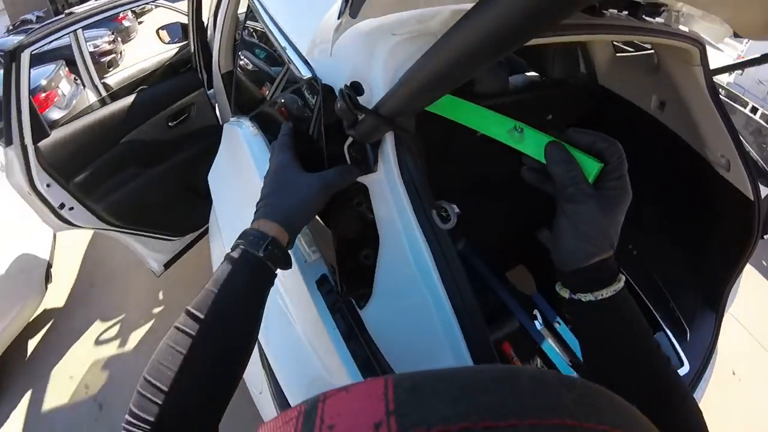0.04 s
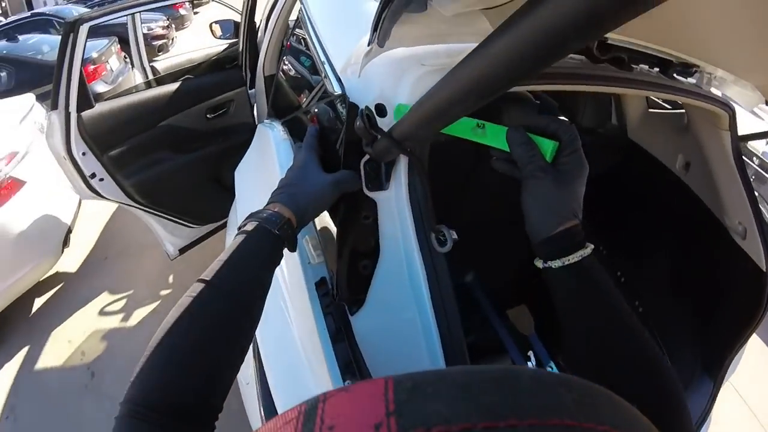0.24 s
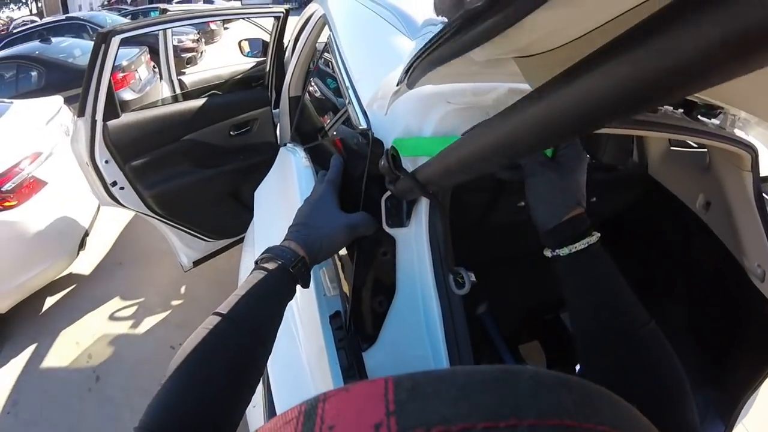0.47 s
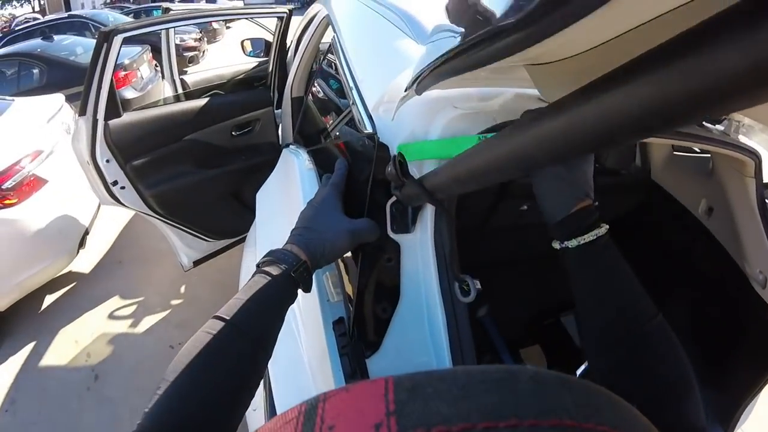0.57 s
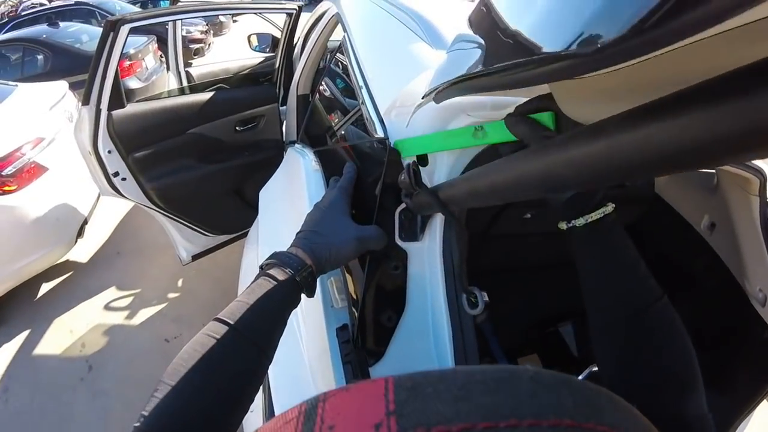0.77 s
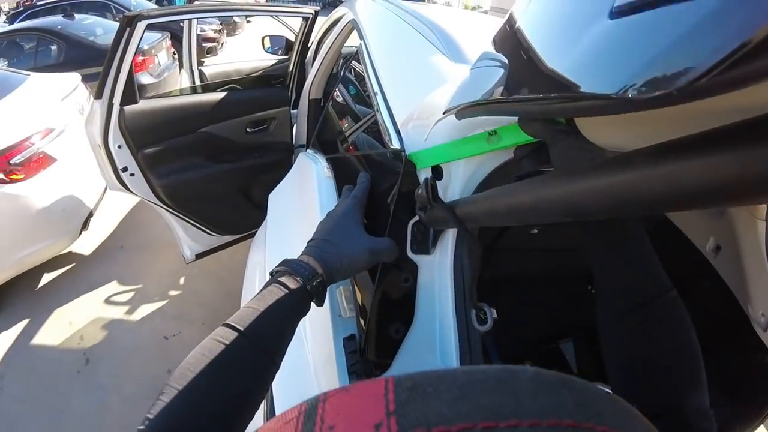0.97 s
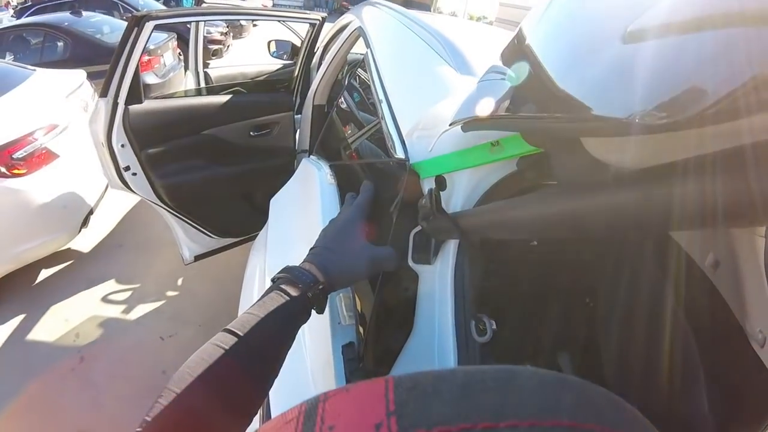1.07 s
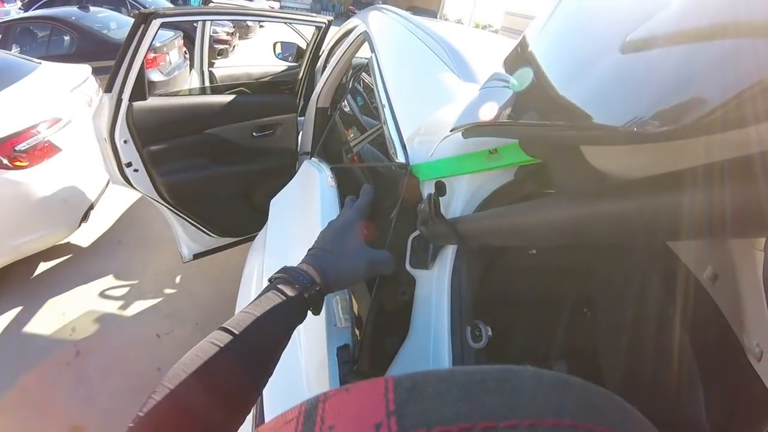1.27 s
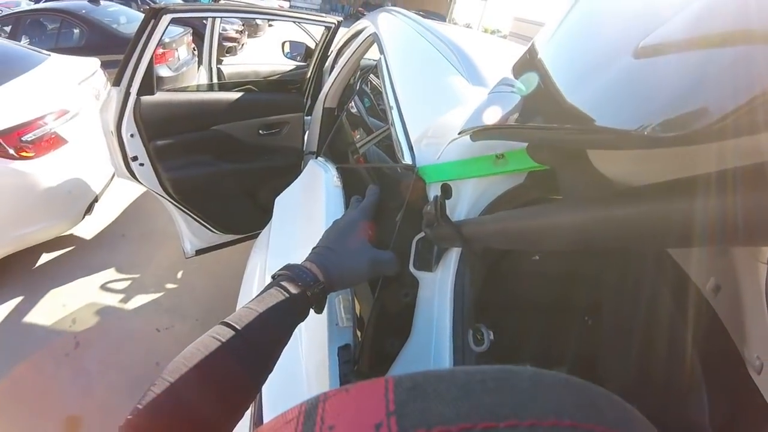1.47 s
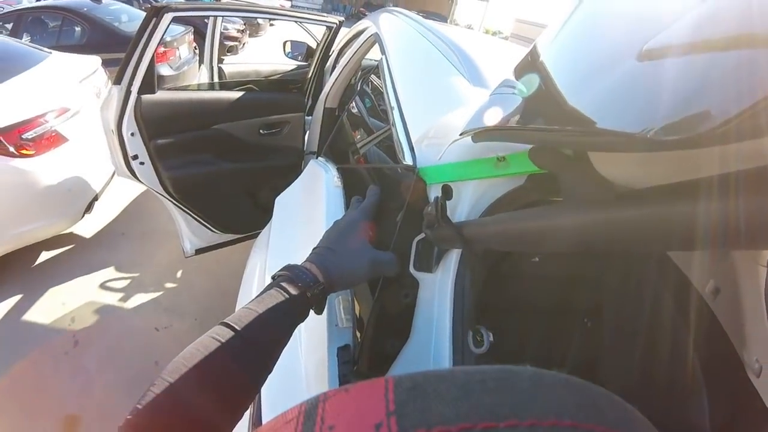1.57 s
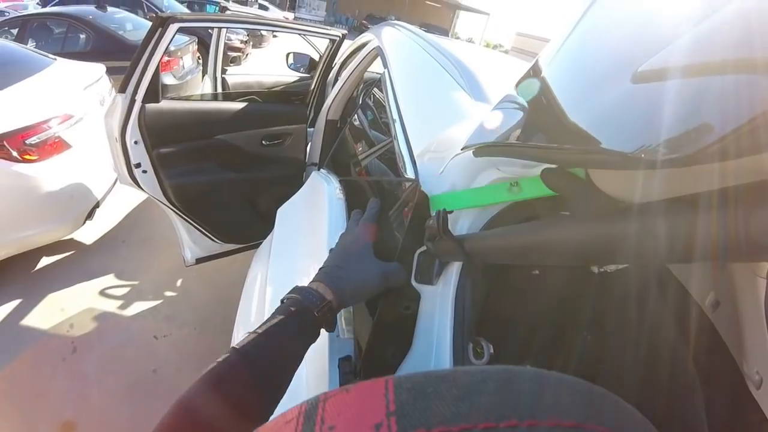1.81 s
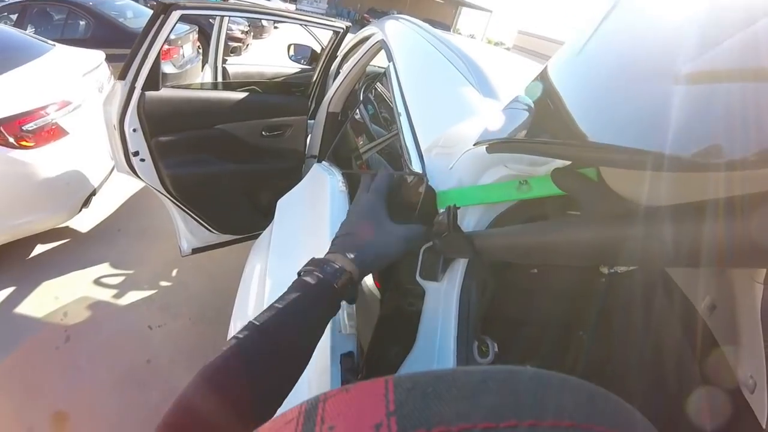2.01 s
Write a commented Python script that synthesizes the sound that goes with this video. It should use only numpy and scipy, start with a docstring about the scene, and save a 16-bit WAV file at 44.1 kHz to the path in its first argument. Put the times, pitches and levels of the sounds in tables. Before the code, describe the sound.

A sharp plastic snap at about 0.97 seconds as a trim clip lets go of a car pillar, with a brief twang and rattle. Before it, a short gritty slide at 0.35-0.55, a light tick near 0.63, then hollow flexing and creaks from 0.87. Light ticks and knocks follow from 1.4 to 2.0. Wind thumps and flutters on the close microphone, strongest near 0.7 and 0.9, over steady outdoor rush, faint hum and a thin distant whine.

```python
"""Outdoors, beside a car pillar: a plastic pry tool works under the trim while wind buffets the microphone.
Something slides briefly along the trim: tiny slips ring resonances, with a friction hiss. The panel flexes
in hollow shudders and creaks, then a clip lets go with a sharp snap: a crack, ringing modes, a twang and a
rattle. Light ticks of coloured noise and ringing come before and after the snap. Behind it lie a steady
rush and faint hum of filtered noise, and a thin, distant, wavering whine."""
import sys
import numpy as np
from scipy import signal
from scipy.fft import rfft, irfft
from scipy.io import wavfile
from scipy.ndimage import uniform_filter1d

SR = 44100
rng = np.random.default_rng(int(sys.argv[2]) if len(sys.argv) > 2 else 0)


def file_out(sig):
    """Save sig as 16-bit WAV at sys.argv[1]."""
    # one column per channel
    cols = np.atleast_2d(sig).T
    # limit, then scale
    lim = np.clip(cols, -1, 1)
    pcm = np.round(lim * 32767).astype(np.int16)
    wavfile.write(sys.argv[1], SR, pcm)


N = 90404  # length in samples
TIME = np.arange(N) / SR  # seconds


def from_db(db):
    """Turn decibels into a gain."""
    return 10 ** (np.asarray(db) / 20)


def rms_one(x):
    """Scale a signal to an average power of one."""
    return x / np.sqrt(np.mean(x ** 2) + 1e-20)


def in_time(rows):
    """Join the rows of a table by straight lines, giving one signal per column after the time."""
    s, *columns = np.transpose(rows)
    return [np.interp(TIME, s, c) for c in columns]


def noise(spectrum):
    """Make noise of unit power, coloured by a table of pitches and levels."""
    hz, db = np.transpose(spectrum)
    bin_hz = np.maximum(np.arange(N // 2 + 1) * SR / N, 1)
    # levels are joined along a logarithmic pitch scale
    bin_db = np.interp(np.log(bin_hz), np.log(hz), db, left=-90, right=-120)
    white = rfft(rng.standard_normal(N))
    return rms_one(irfft(white * from_db(bin_db), N))


def steadied(x, size):
    """Even out the chance swells of a noise over a window of `size` samples."""
    return x / np.sqrt(uniform_filter1d(x ** 2, size) + 1e-9)


def soften(x, hz, order=2):
    """Take away the treble above a cut-off pitch."""
    low_pass = signal.butter(order, min(hz, .45 * SR), fs=SR, output="sos")
    return signal.sosfilt(low_pass, x + 1e-18)


def resonate(x, hz, width):
    """Pass a signal through one resonance with gain 1 at its top; a narrower width rings longer."""
    r = np.exp(-np.pi * width / SR)
    top = np.array([1, 0, -1]) * (1 - r * r) / 2
    return signal.lfilter(top, [1, -2 * r * np.cos(2 * np.pi * hz / SR), r * r], x)


def ring(force, modes):
    """Let a force set off a table of modes, each a sine that dies away by 60 dB in its ring time."""
    out = np.zeros(N)
    for k, (hz, db, ring_s) in enumerate(modes):
        r = np.exp(-np.log(1000) / (ring_s * SR))
        w = 2 * np.pi * hz / SR
        mode = signal.lfilter([0, np.sin(w)], [1, -2 * r * np.cos(w), r * r], force + 1e-18)
        out += (-1) ** k * from_db(db) * mode  # neighbours have opposite signs
    return out


def click(s, db):
    """Make a single one-sample impulse."""
    return from_db(db) * (np.arange(N) == int(s * SR))


def slips(per_s, spread_db):
    """Friction sticks and slips: impulses of random time, sign and size."""
    happens = rng.random(N) < per_s / SR
    sign = rng.choice([-1, 1], N)
    size = from_db(spread_db * np.minimum(rng.exponential(1, N), 4))
    return happens * sign * size


def dying(s, decay_s, attack_s=0.0013):
    """Make an envelope that rises quickly and dies away."""
    age = np.maximum(TIME - s, 0)
    return (1 - np.exp(-(age / attack_s) ** 2)) * np.exp(-age / decay_s)


def swells(rows):
    """Add up bell-shaped efforts."""
    return sum(from_db(db) * np.exp(-((TIME - s) / half) ** 2 / 2) for s, db, half in rows)


# colour of the outdoor rush: pitch_hz, relative_level_db (per Hz)
RUSH_COLOUR = [(100, 1.5), (250, 4.5), (450, -2.5), (750, -1), (1050, 1), (1380, -0.5), (1700, -11),
               (2300, -18), (3500, -16.5), (4600, -24.5), (8300, -30), (10000, -38.5), (12500, -41),
               (14000, -78)]
# loudness of the rush before its overall gain: time_s, level_db
RUSH_LEVEL = [(0.02, -46.5), (0.79, -47), (1.64, -46), (2.05, -45)]
RUSH_GAIN_DB = 2.5


def rush():
    """A broad, steady outdoor rush is noise with a fixed colour."""
    level_db, = in_time(RUSH_LEVEL)
    return from_db(level_db + RUSH_GAIN_DB) * noise(RUSH_COLOUR)


HUM_HZ, HUM_WIDTH_HZ, HUM_DB = 356.6, 7.7, -56.5


def hum():
    """A faint hum is noise squeezed through one narrow resonance."""
    return from_db(HUM_DB) * rms_one(resonate(rng.standard_normal(N), HUM_HZ, HUM_WIDTH_HZ))


# loudness of the distant whine, which grows overall: time_s, level_db
WHINE_LEVEL = [(0, -70.5), (.45, -73), (.75, -65), (1.2, -61.5), (1.55, -62.5), (1.85, -57), (2.05, -60.5)]
WHINE_HZ, WHINE_WAVER_HZ = 2127, 1.75


def whine():
    """A thin whine is a sine whose pitch drifts slightly and slowly."""
    pitch = WHINE_HZ + WHINE_WAVER_HZ * rms_one(soften(rng.standard_normal(N), hz=6.0))
    tone = rms_one(np.sin(2 * np.pi * np.cumsum(pitch) / SR))
    level_db, = in_time(WHINE_LEVEL)
    return from_db(level_db) * tone


# loudness of the wind's rumble before its overall gain: time_s, level_db
RUMBLE_LEVEL = [(0.02, -23.5), (0.11, -42), (0.18, -22.5), (0.22, -24), (0.39, -30), (0.58, -27),
                (0.69, -16), (0.77, -26.5), (0.83, -21.5), (0.895, -15), (0.95, -28.5), (1.01, -21.5),
                (1.07, -32), (1.16, -21), (1.31, -29), (1.375, -21.5), (1.45, -34), (1.62, -29),
                (1.70, -31.5), (1.76, -28), (1.86, -32), (2.05, -31.5)]
# colour of the rumble: pitch_hz, relative_level_db (per Hz)
RUMBLE_COLOUR = [(15, -0.5), (28, 2), (45, -8), (65, -8.5), (95, -22), (140, -26), (300, -52)]
# loudness of the wind's flutter before its overall gain: time_s, level_db
FLUTTER_LEVEL = [(0.02, -49.5), (0.19, -46), (0.33, -49.5), (0.52, -34), (0.59, -37), (0.665, -26),
                 (0.74, -42), (0.82, -41), (0.885, -33), (0.96, -40), (1.08, -46), (1.16, -42), (1.27, -77),
                 (1.41, -34.5), (1.54, -59), (1.65, -43), (1.71, -45), (1.9, -44), (1.97, -39.5),
                 (2.05, -61)]
# colour of the flutter: pitch_hz, relative_level_db (per Hz)
FLUTTER_COLOUR = [(60, -14), (110, 5), (160, -4), (240, -13), (400, -26.5), (900, -30.5)]
# a single buffet of air: time_s, peak_db, width_s
BUFFETS = [(0.889, -7.5, .0072)]
RUMBLE_GAIN_DB, FLUTTER_GAIN_DB = 1, -2


def wind():
    """Eddies rumble and flutter on the microphone; the strongest arrives as a single pressure swing."""
    rumble_db, = in_time(RUMBLE_LEVEL)
    flutter_db, = in_time(FLUTTER_LEVEL)
    out = from_db(rumble_db + RUMBLE_GAIN_DB) * steadied(noise(RUMBLE_COLOUR), size=2500)
    out += from_db(flutter_db + FLUTTER_GAIN_DB) * steadied(noise(FLUTTER_COLOUR), size=1800)
    for s, db, width in BUFFETS:
        u = (TIME - s) / width
        out += from_db(db) * (1 - u * u) * np.exp(-u * u / 2)  # a push with a dip on each side
    return out


# rise and fall of the sliding contact, before the gains below: time_s, relative_level_db
SLIDE_LEVEL = [(0.338, -68), (0.36, -47), (0.39, -41.5), (0.422, -36.5), (0.475, -42.5), (0.515, -51),
               (0.56, -76)]
# resonances under the slide: pitch_hz, width_hz, relative_level_db, swell_delay_s (negative is earlier)
SLIDE_BODY = [(2660, 200, -5.5, 0.001), (3050, 280, -9.5, 0), (3580, 240, -8, -0.010),
              (6200, 600, -20, -0.017)]
# colour of the friction hiss: pitch_hz, relative_level_db
HISS_COLOUR = [(400, -1), (650, 1), (900, 2), (1400, -2), (1800, -5), (3000, -10), (4500, -23.5),
               (8000, -32), (13000, -43)]
# loudness of the trim's main ring under the slide: time_s, level_db
SLIDE_RING_LEVEL = [(0.29, -76), (0.33, -44.5), (0.36, -41), (0.405, -39.5), (0.42, -62), (0.436, -38.5),
                    (0.47, -36.5), (0.53, -61)]
SLIDE_RING_HZ, SLIDE_RING_WIDTH_HZ = 1202, 85
SLIPS_PER_S, BODY_GAIN_DB = 1100, 15.5
HISS_GAIN_DB, HISS_DELAY_S = -2, 0.016
GRIT_RATE_HZ, GRIT_SWING_DB = 160, 1.8  # quick random unevenness of the rub


def slide():
    """Dense tiny slips excite the trim; the rub starts bright and turns broader and duller toward its end."""
    level_db, = in_time(SLIDE_LEVEL)
    uneven_db = GRIT_SWING_DB * rms_one(soften(rng.standard_normal(N), GRIT_RATE_HZ))
    force = slips(SLIPS_PER_S, spread_db=-4)

    def swell(delay_s):
        """The rise and fall of the rub, shifted in time."""
        return from_db(np.interp(TIME - delay_s, TIME, level_db) + uneven_db)

    body = np.zeros(N)
    for k, (hz, width, db, delay_s) in enumerate(SLIDE_BODY):
        body += (-1) ** k * from_db(db) * swell(delay_s) * resonate(force, hz, width)
    body *= from_db(BODY_GAIN_DB) / np.std(force)

    ring_db, = in_time(SLIDE_RING_LEVEL)
    ringing = rms_one(resonate(force, SLIDE_RING_HZ, SLIDE_RING_WIDTH_HZ))
    main_ring = from_db(ring_db) * steadied(ringing, size=1500)
    hiss = from_db(HISS_GAIN_DB) * swell(HISS_DELAY_S) * noise(HISS_COLOUR)
    return soften(main_ring, hz=2500) + soften(body, hz=6450) + hiss


# hollow modes of the whole panel: pitch_hz, relative_level_db, ring_time_s
PANEL = [(245, -1, 0.05), (285, 2, 0.045), (358, -2, 0.04), (510, -11, 0.04), (700, -16, 0.04),
         (993, -17, 0.05), (1170, -16, 0.046)]
# moments when the panel flexes: centre_s, level_db, half_length_s
FLEXES = [(0.675, -41, 0.008), (0.879, -34.5, 0.006), (0.895, -30.5, 0.006), (0.994, -32.5, 0.011),
          (1.442, -44, .005), (1.462, -37, 0.006)]


def flexing():
    """Under the lever the panel shifts in short hollow shudders, its modes shaken by random slips."""
    shudder = rms_one(ring(slips(900, spread_db=3), PANEL))
    return swells(FLEXES) * steadied(shudder, size=700)


# creaks of the trim under load: centre_s, level_db, half_length_s, pitch_hz
CREAKS = [(0.869, -39.5, 0.0105, 1008), (0.936, -41.5, 0.006, 985)]
CREAK_WAVER_HZ, CREAK_ROUGH_DB = 22, 2.2


def creaking():
    """The trim creaks just before it gives: short tones with a shaky pitch and a rough loudness."""
    out = np.zeros(N)
    for s, db, half, hz in CREAKS:
        waver, rough = rms_one(soften(rng.standard_normal((2, N)), hz=90))
        pitch = hz + CREAK_WAVER_HZ * waver
        tone = rms_one(np.sin(2 * np.pi * np.cumsum(pitch) / SR))
        out += swells([(s, db, half)]) * from_db(CREAK_ROUGH_DB * rough) * tone
    return out


# light touches, knock and grit before their gains: start_s, knock_db, grit_db, clip_impulse_db
TICKS = [(0.629, -45, -55, -62), (1.399, -39, -45, -55), (1.458, -43, -52, -62), (1.6365, -43, -55, -62),
         (1.731, -42, -53, -62), (1.8584, -50, -40, -48), (1.909, -45, -55, -65), (1.9700, -48, -52, -41)]
# colour of the dull knock: pitch_hz, relative_level_db
KNOCK_COLOUR = [(200, -3), (700, 0), (1100, 5), (1450, 2), (1900, -19), (3000, -21), (6000, -34)]
# colour of the gritty tick: pitch_hz, relative_level_db
GRIT_COLOUR = [(1500, -20), (2400, -10), (2900, 3), (3800, 6), (4400, -19), (7000, -27), (12000, -34)]
# modes of a loose clip: pitch_hz, relative_level_db, ring_time_s
CLIP = [(3390, -2, .04), (4640, -19, .03), (11200, -29, .03)]
KNOCK_GAIN_DB, KNOCK_DECAY_S = 4.5, 0.012
GRIT_GAIN_DB, GRIT_DECAY_S = 0.5, .004


def ticks():
    """Light touches give a dull knock and a gritty tick, and set a loose clip ringing."""
    knock, grit, taps = np.zeros(N), np.zeros(N), np.zeros(N)
    for s, knock_db, grit_db, clip_db in TICKS:
        knock += from_db(knock_db + KNOCK_GAIN_DB) * dying(s, KNOCK_DECAY_S)
        grit += from_db(grit_db + GRIT_GAIN_DB) * dying(s, GRIT_DECAY_S, attack_s=0.0015)
        taps += click(s, clip_db)
    knock *= steadied(noise(KNOCK_COLOUR), size=200)
    grit *= steadied(noise(GRIT_COLOUR), size=100)
    return knock + grit + ring(taps, CLIP)


TWANG_S, TWANG_DB, TWANG_RISE_S, TWANG_FALL_S = 0.9741, -21, .003, .0017  # time and level of its peak
TWANG_HZ, SAG_HZ_PER_S, SAG_RANGE_HZ = 1177, 81000, 238  # the sag runs from range above to range below


def twang(release_s):
    """The freed trim springs back: its ring swells, sags in pitch and is stopped against the pillar."""
    age = TIME - TWANG_S
    pitch = TWANG_HZ - np.clip(SAG_HZ_PER_S * age, -SAG_RANGE_HZ, SAG_RANGE_HZ)
    turns = np.cumsum(pitch * (TIME > release_s)) / SR
    side_s = np.where(age < 0, TWANG_RISE_S, TWANG_FALL_S)
    swing = np.exp(-(age / side_s) ** 2 / 2)
    return from_db(TWANG_DB) * swing * np.sin(2 * np.pi * turns)


# colour of the loosened trim settling: pitch_hz, relative_level_db
RATTLE_COLOUR = [(150, -16), (300, -14), (550, -2), (800, 6), (1150, 8), (1400, 0), (1800, -12),
                 (3200, -16), (6000, -28)]
RATTLE_START_S, RATTLE_DB, RATTLE_DECAY_S = 0.974, -32, 0.019


def rattle():
    """The freed trim comes back against the pillar and settles in a short burst of coloured noise."""
    envelope = from_db(RATTLE_DB) * dying(RATTLE_START_S, RATTLE_DECAY_S, attack_s=0.0024)
    return envelope * steadied(noise(RATTLE_COLOUR), size=300)


SNAP = [(0.9661, -24, 13000), (0.9670, -26, 9000), (0.9689, -27.5, 5500)]
# modes of the trim: pitch_hz, relative_level_db, ring_time_s
TRIM = [(470, -10, .025), (1007, -10, 0.055), (1227, -7, 0.056), (1850, -21, 0.015), (2480, -16, .02),
        (2735, -11, 0.032), (2980, -10.5, 0.016), (3300, -13.5, .018), (3620, -15, 0.025),
        (5200, -19, 0.018), (5900, -24, .012), (6900, -22, 0.016), (8700, -22.5, .013), (10800, -22, 0.011),
        (13000, -28, .01)]
# colour of the crack: pitch_hz, relative_level_db
CRACK_COLOUR = [(300, 0), (900, 6), (1400, 7), (2100, -8), (2700, 4.5), (3600, 2.5), (4400, -12),
                (5300, -3), (7000, -7), (9000, -14), (13000, -21), (15000, -38)]
CRACK_DB, CRACK_DECAY_S = -24.5, .0026


def snap():
    release_s = SNAP[0][0]
    force = sum(soften(click(s, db), hz, order=1) for s, db, hz in SNAP)
    crack = from_db(CRACK_DB) * dying(release_s, CRACK_DECAY_S, attack_s=0.00015)
    crack = crack * steadied(noise(CRACK_COLOUR), size=100)
    return soften(ring(force, TRIM) + crack, hz=13100) + twang(release_s) + rattle()


def scene():
    """Add all the sources at the one microphone."""
    background = rush() + hum() + whine() + wind()
    trim = slide() + flexing() + creaking() + ticks() + snap()
    return (background + trim)[None]


CUTOFF_HZ = 15700


def record(dry):
    """Cut the very top of the treble with a steep low-pass."""
    return signal.sosfilt(signal.cheby2(12, 70, CUTOFF_HZ, fs=SR, output="sos"), dry)


dry = scene()
out = record(dry)
file_out(out)
```